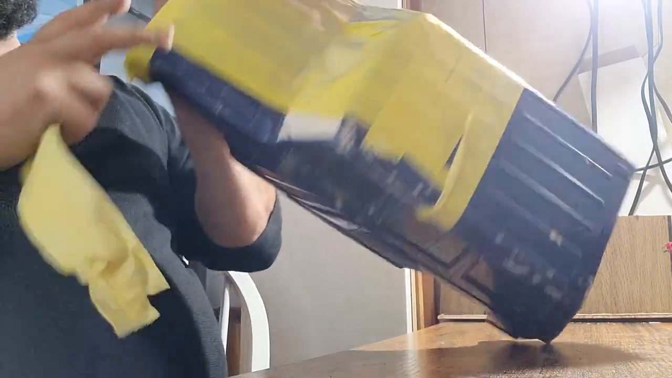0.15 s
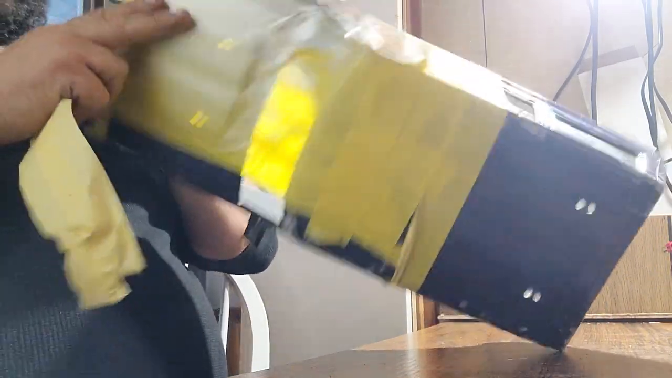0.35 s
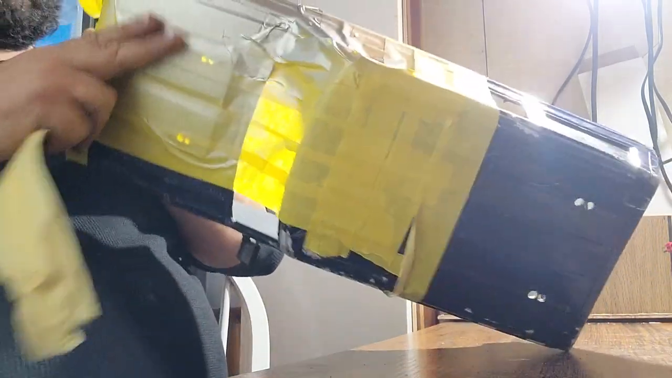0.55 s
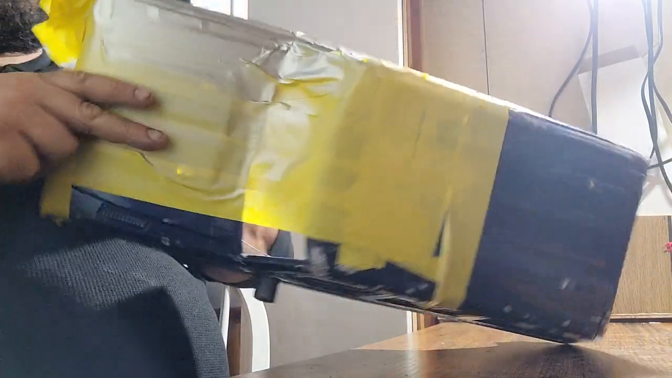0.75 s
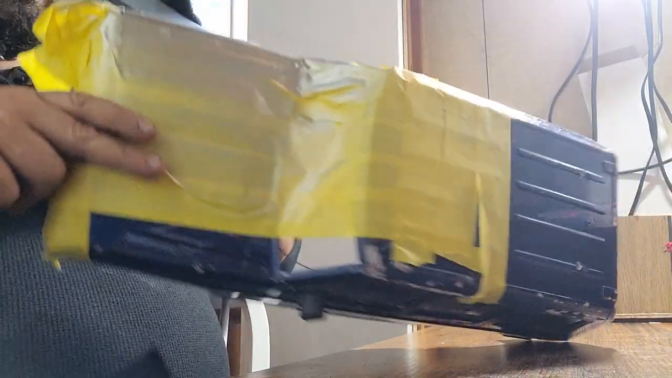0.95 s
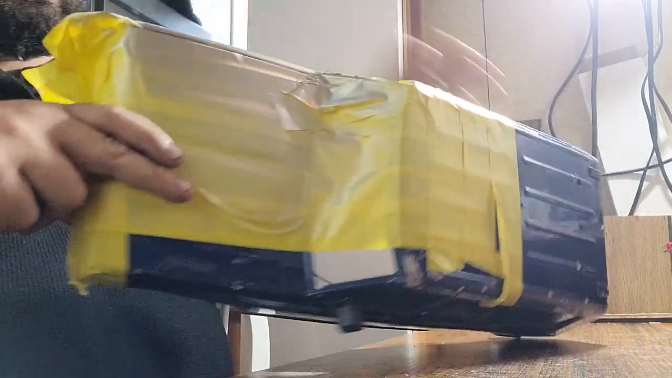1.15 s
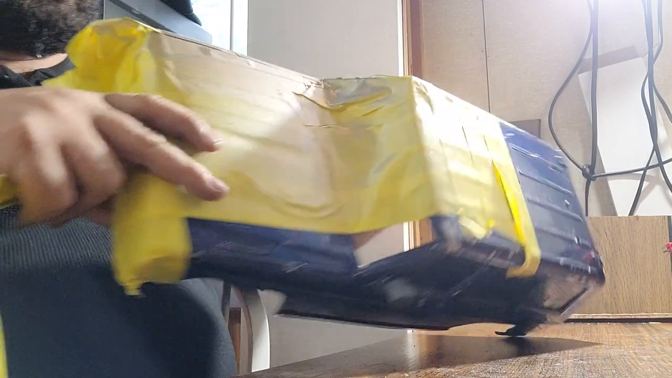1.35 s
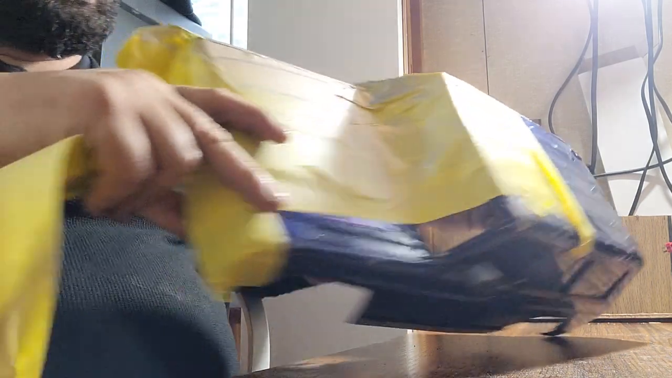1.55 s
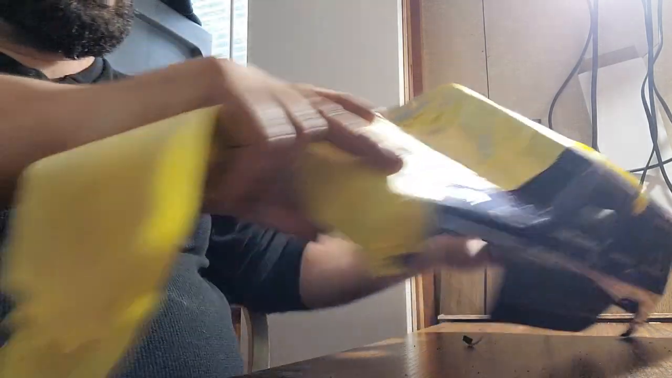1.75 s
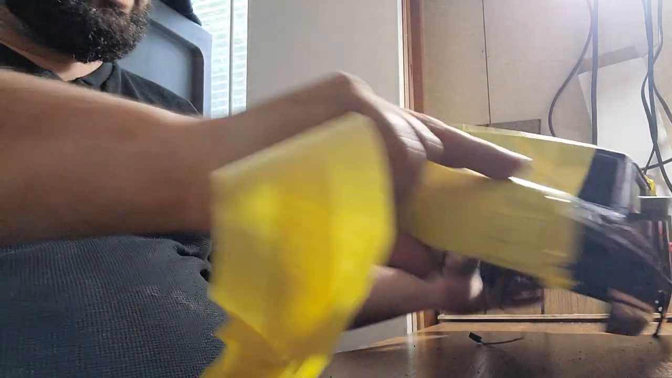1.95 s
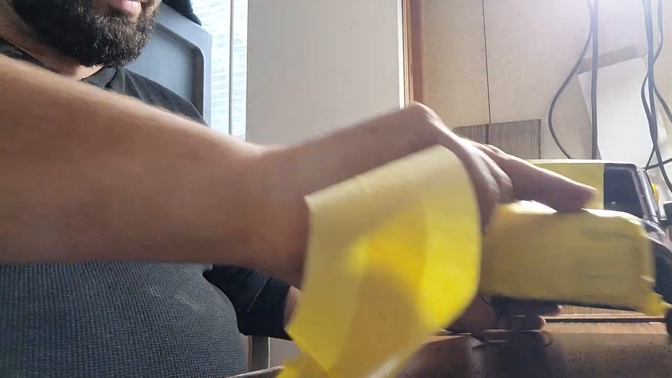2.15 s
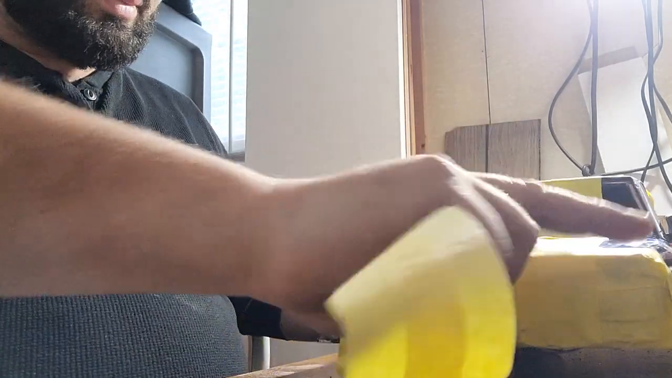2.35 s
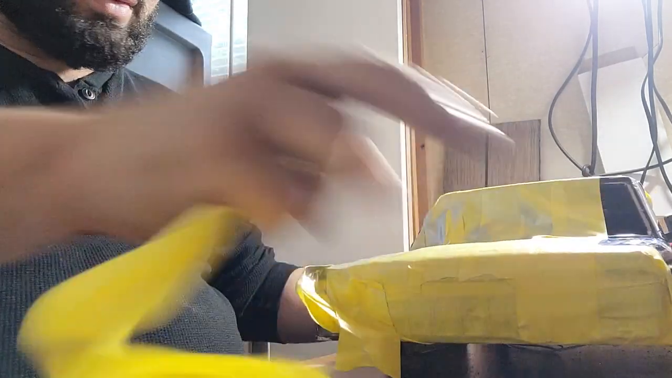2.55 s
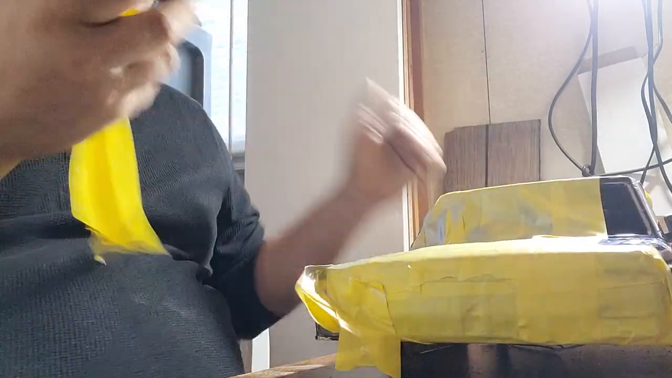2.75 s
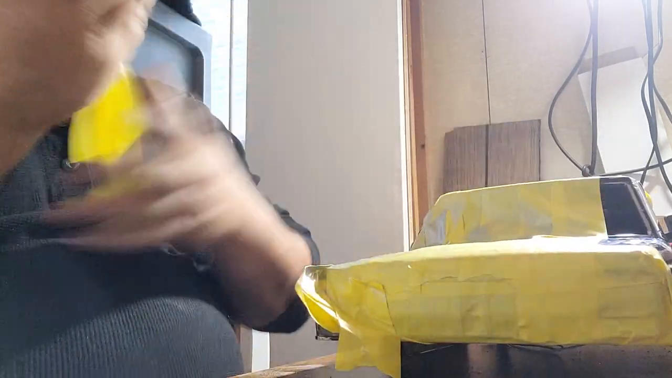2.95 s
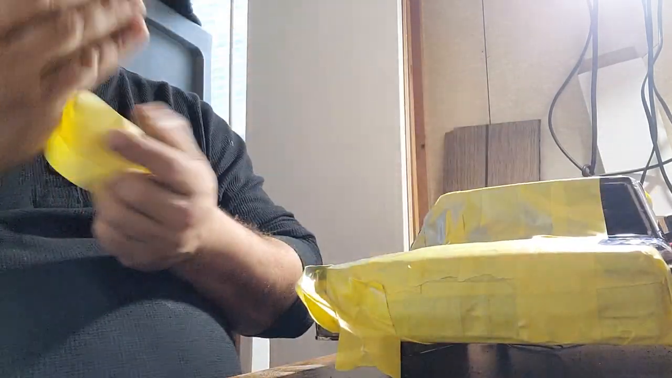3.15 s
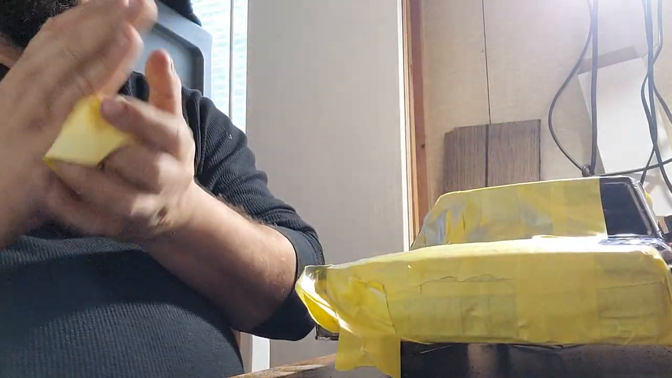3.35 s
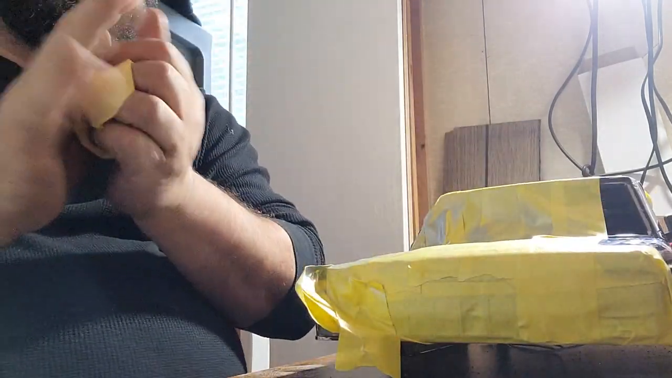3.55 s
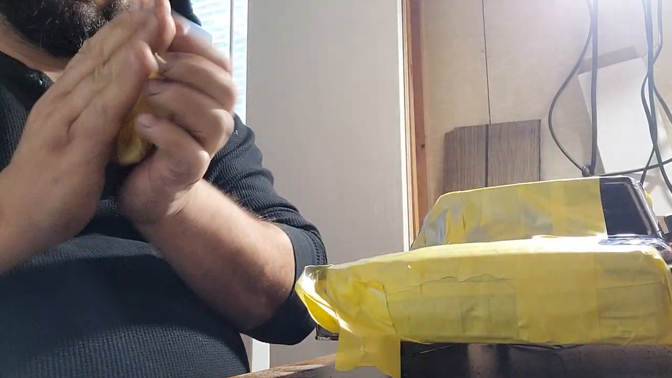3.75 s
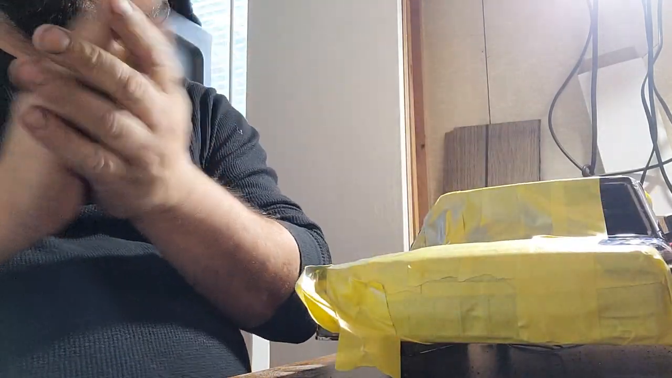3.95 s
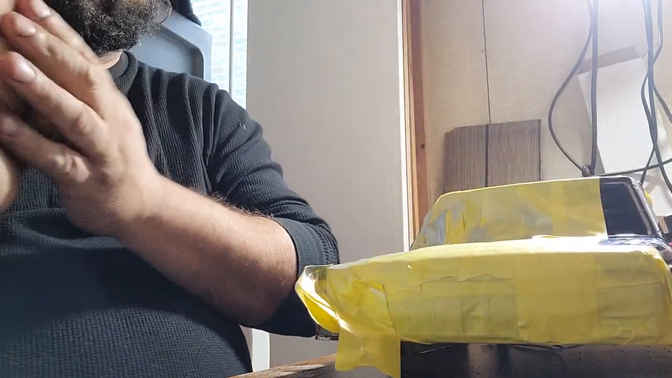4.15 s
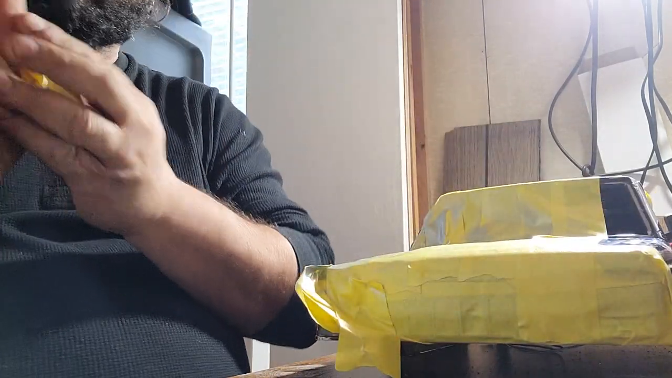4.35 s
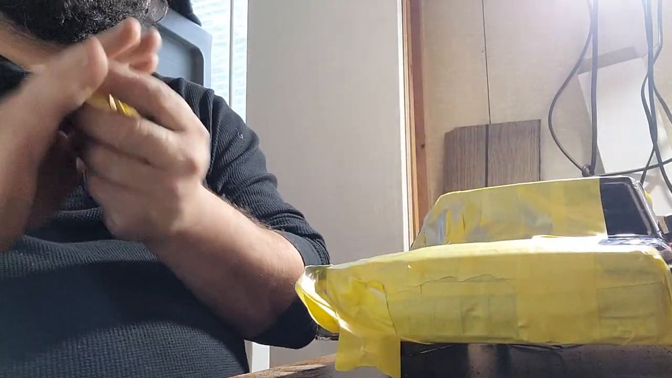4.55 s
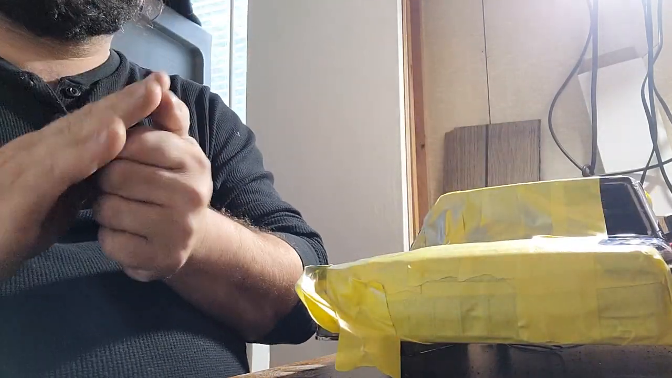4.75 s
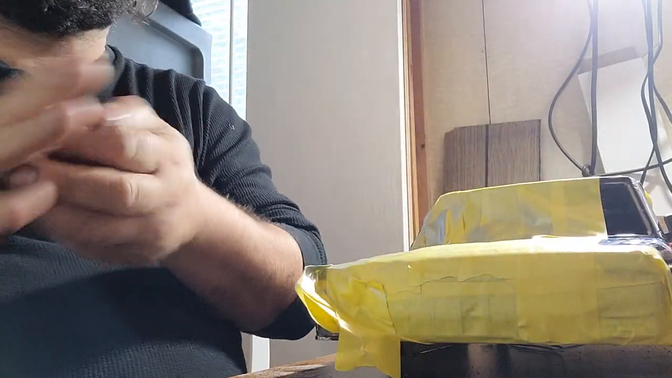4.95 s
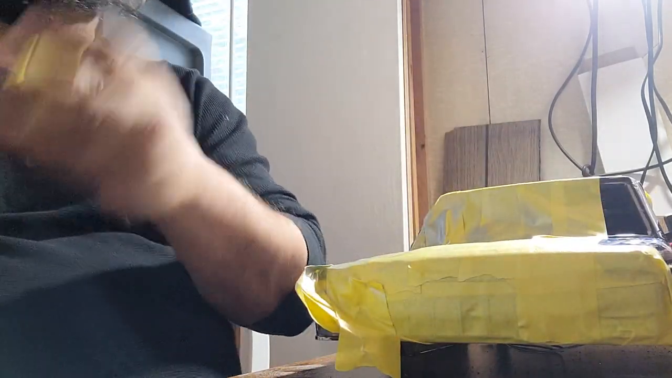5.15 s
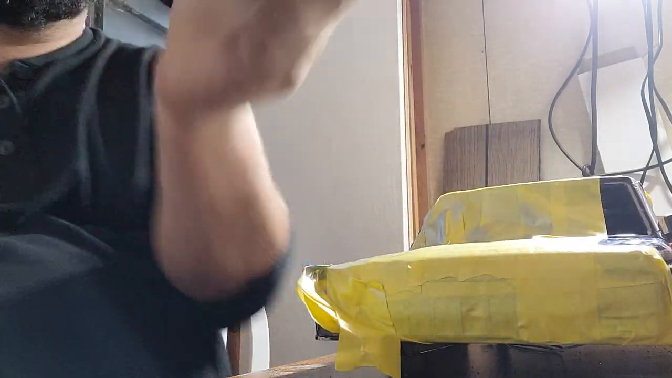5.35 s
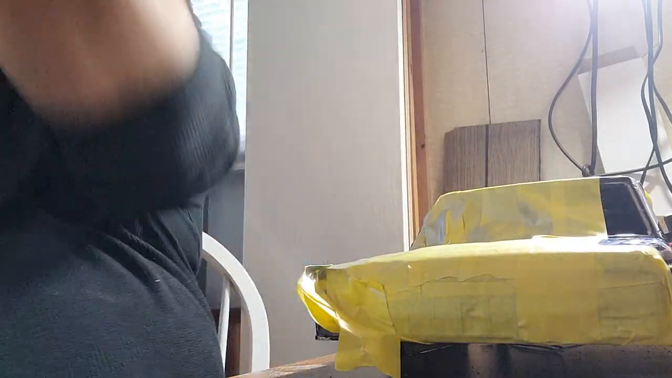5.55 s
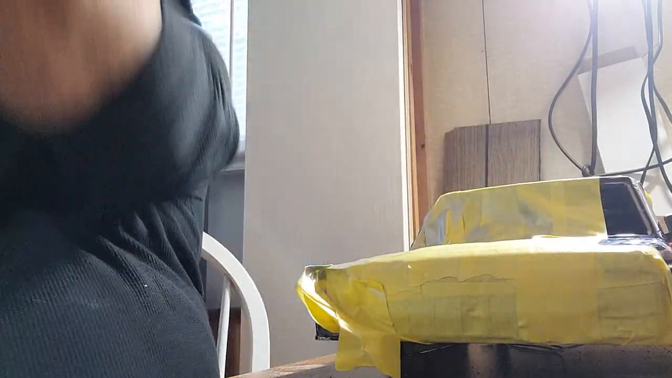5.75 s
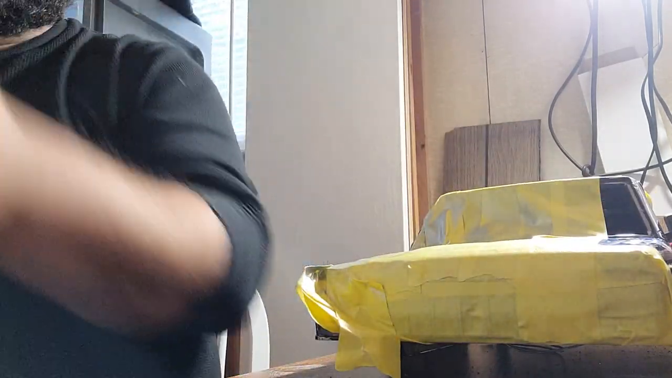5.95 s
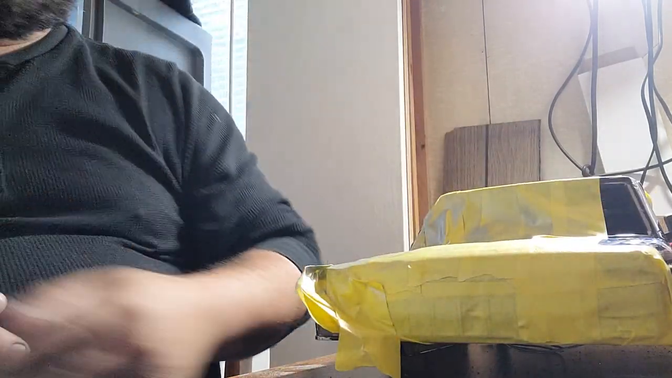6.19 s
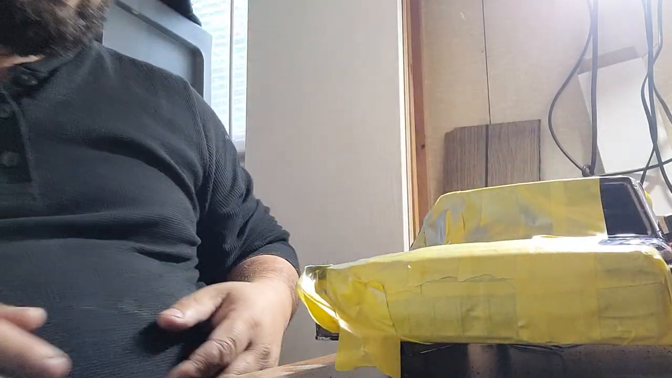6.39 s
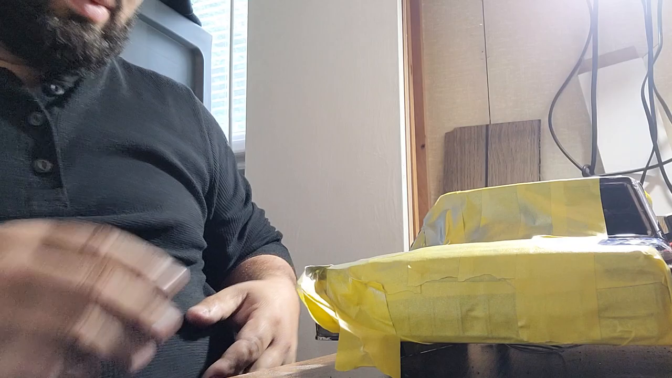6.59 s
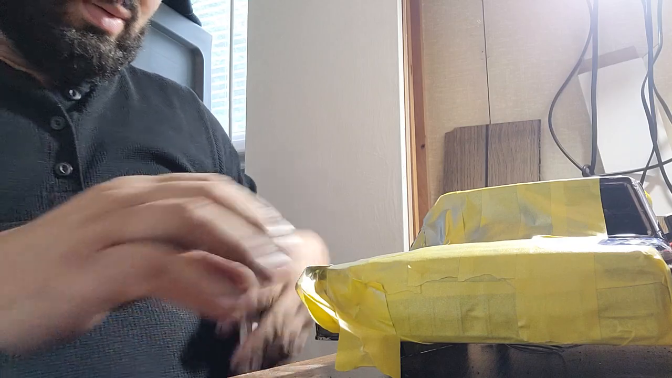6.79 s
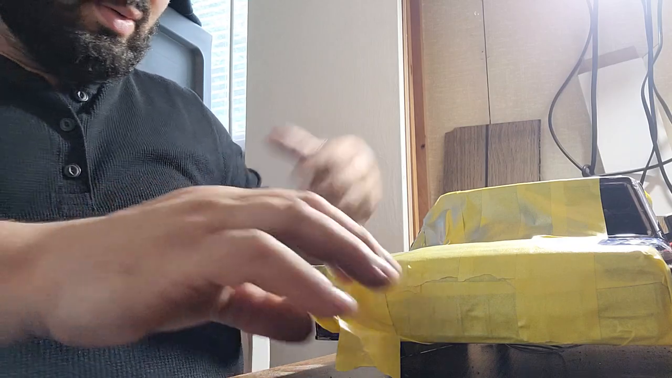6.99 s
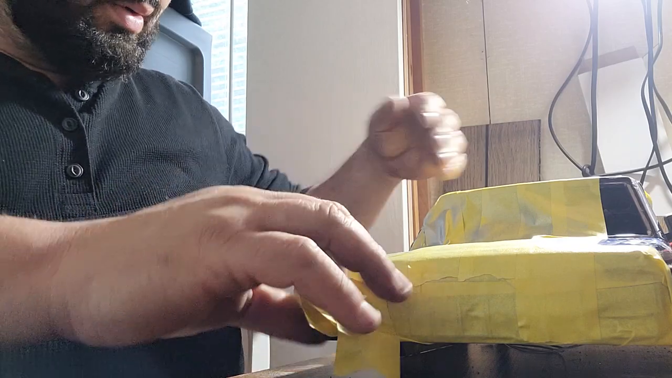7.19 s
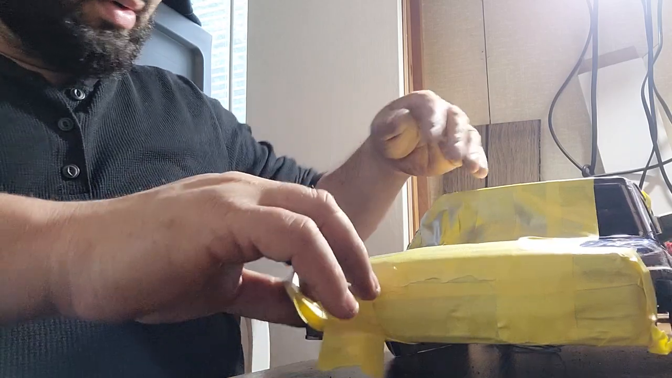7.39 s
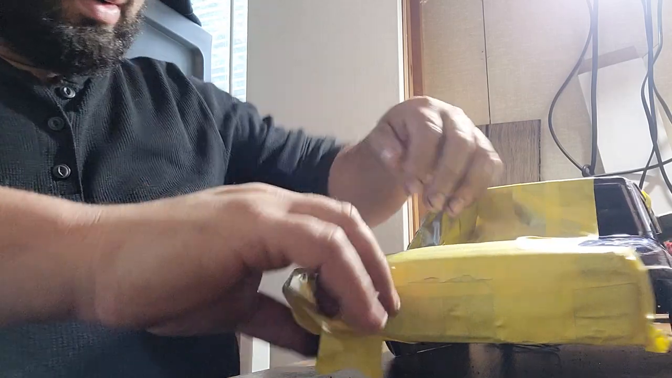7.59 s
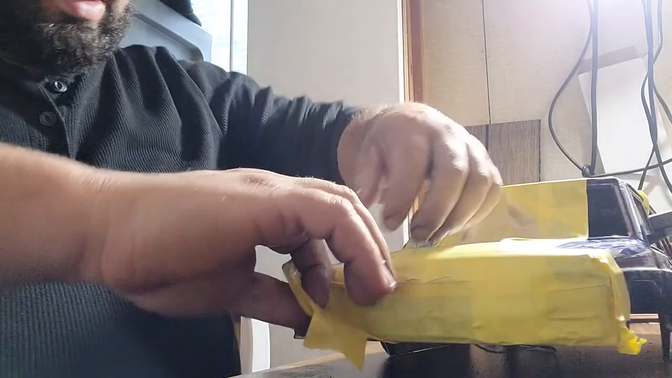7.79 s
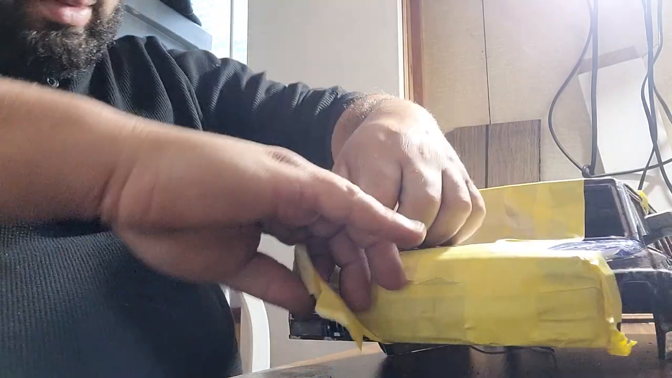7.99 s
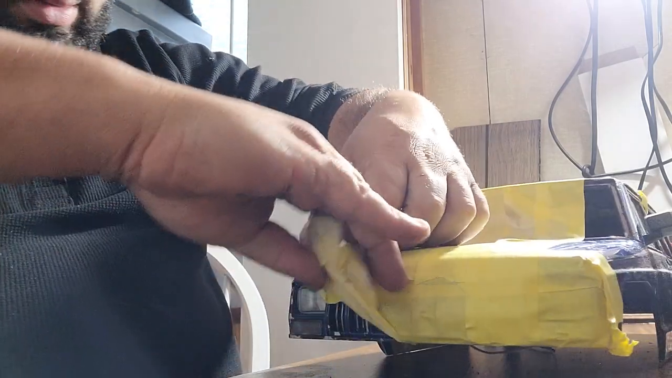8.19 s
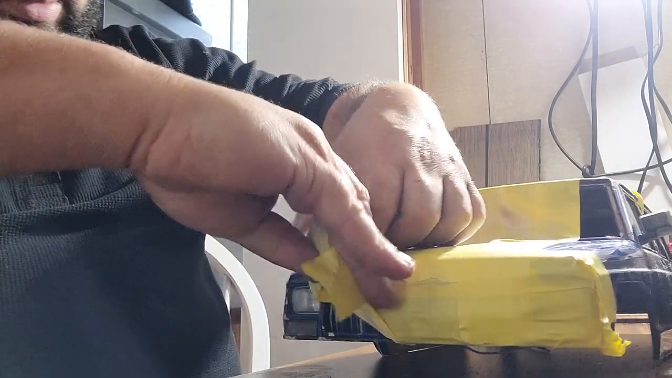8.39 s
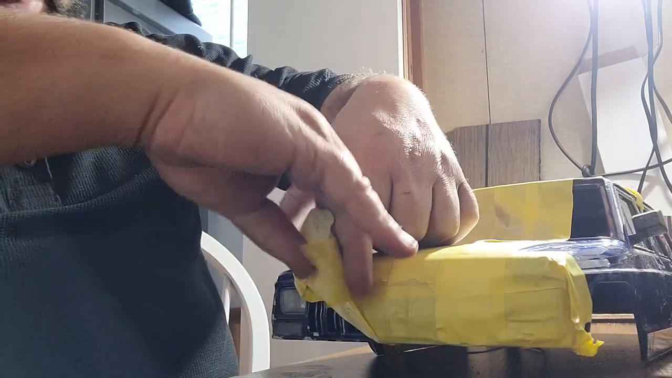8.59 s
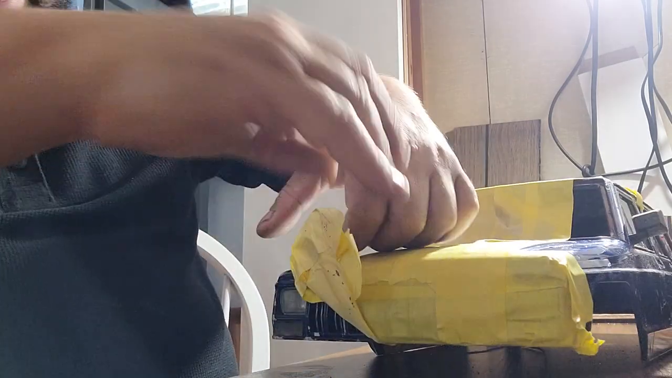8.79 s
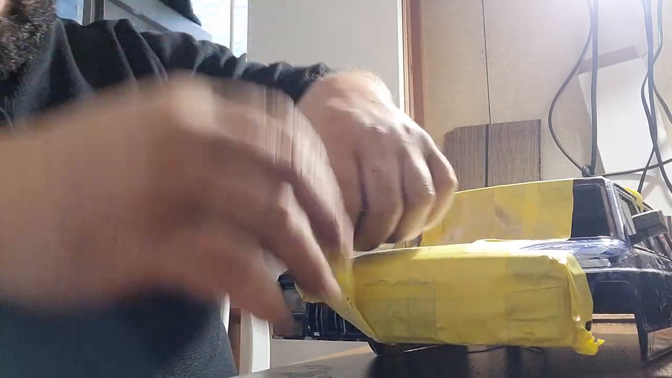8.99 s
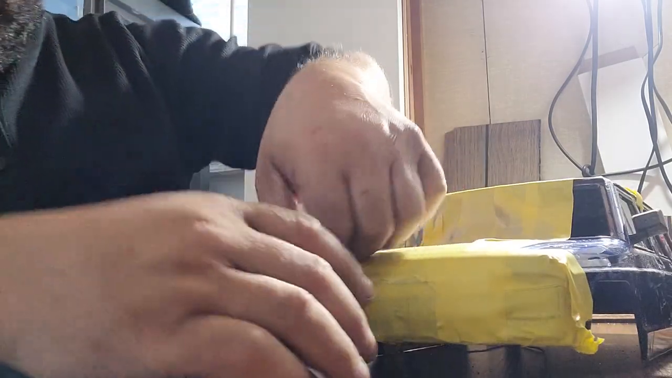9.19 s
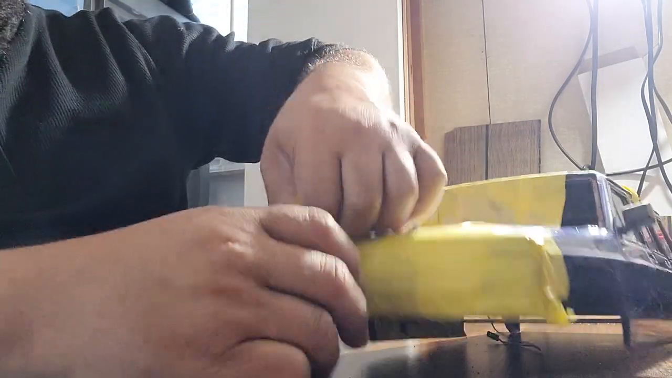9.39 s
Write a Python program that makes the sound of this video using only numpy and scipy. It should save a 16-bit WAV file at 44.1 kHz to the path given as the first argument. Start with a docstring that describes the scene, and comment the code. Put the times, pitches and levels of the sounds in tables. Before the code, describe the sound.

Boomy plastic knocks and a groaning drag on wood give way to crisp tape crumpling, soft bumps, then snappy peeling with dull thumps.

```python
"""On a wooden workbench in a small, quiet room, a hollow plastic model car body wrapped in masking tape
is knocked and dragged: struck modes, and random slips that drive the shell, bench and thin panels.
A strip of tape is crumpled between the palms and tossed aside; tape is tugged and peeled: filtered crackle,
bursts and pops. Each squeeze and rub swells, holds and dies away over a faint bed of room noise.
A phone with two microphones stands close by on the bench."""
import sys
import numpy as np
from scipy import signal
from scipy.fft import rfft, irfft
from scipy.io import wavfile
from scipy.ndimage import uniform_filter1d

SR = 44100
rng = np.random.default_rng(int(sys.argv[2]) if len(sys.argv) > 2 else 0)


def master_out(mix):
    """Clip the mix to full scale and print it as 16-bit PCM to the path in sys.argv[1]."""
    frames = np.transpose(np.atleast_2d(mix))
    ceiling = np.clip(frames, -1, 1)
    pcm = np.round(ceiling * 32767).astype(np.int16)
    wavfile.write(sys.argv[1], SR, pcm)


N = 415863
TIME = np.arange(N) / SR  # s

# Levels in the event tables are a starting balance; each layer adds its own trims.
# the shell dragged and turned on the bench: [t/s, shell drone level/dB, rasp level/dB, hiss level/dB]
DRAG_LEVELS = [(0.0, -38.5, -28.5, -41), (0.12, -42.5, -49.5, -53), (0.36, -42.5, -46, -58.5),
               (0.49, -42, -43, -54.5), (0.69, -36, -56, -60.5), (0.74, -30, -43.5, -52),
               (0.84, -33, -66, -55), (0.91, -40, -52.5, -56), (1.02, -34, -45, -54.5),
               (1.24, -48, -52.5, -57), (1.43, -53.5, -60, -53.5), (1.7, -41.5, -39.5, -51),
               (1.86, -39.5, -44.5, -50), (2.09, -41, -42.5, -65), (2.22, -35, -48, -59.5),
               (2.3, -40.5, -50.5, -59.5)]
# a corner sliding on the wood sings: [t/s, resonance f/Hz, level/dB]
CORNER_SQUEAL = [(1.02, 1900, -61), (1.041, 1862, -47.5), (1.131, 2187, -48.5), (1.24, 1983, -65),
                 (1.451, 4240, -73), (1.68, 3830, -44), (1.76, 3120, -33), (1.871, 2890, -51),
                 (2.12, 2360, -54), (2.2, 2430, -79)]
# the shell tips off its corner just before it drops again: [t/s, length/s, dip level/dB]
CORNER_LIFTS = [(0.495, 0.18, -19.5), (2.267, 0.29, -21)]
# knocks and bumps: shell and bench struck, the tossed ball of tape landing, an arm set down:
# [t/s, shell peak level/dB, shell f/Hz, thud level/dB, thud f/Hz, clack level/dB, clack f/Hz]
BUMPS = [(0.011, -17, 347, -44, 117, -35, 876), (0.238, -10, 261, -22, 126, -34.5, 616),
         (0.405, -13, 292, -42, 164, -38, 463), (0.422, -1.5, 293, -20.5, 160, -27, 493),
         (0.686, -20, 255, -34, 142, -44.5, 589), (0.78, -9.5, 250, -61, 164, -35.5, 670),
         (0.807, -6.5, 300, -37, 130, -23.5, 690), (1.033, -28.5, 350, -36, 120, -38, 530),
         (1.445, -23, 265, -37, 161, -48.5, 810), (1.97, -27.5, 268, -39, 128, -36, 847),
         (2.205, -26, 279, -38, 134, -42.5, 850), (2.375, -17.5, 278, -34, 115, -44.5, 844),
         (2.404, -6, 255, -30, 102, -31, 750), (2.423, -4, 300, -22, 65, -19, 560),
         (2.445, -3, 235, -22, 145, -22.5, 910), (2.839, -41, 285, -65, 98, -64, 494),
         (3.272, -37, 287, -65, 103, -49, 611), (3.416, -39, 292, -70, 103, -62, 613),
         (4.035, -36, 280, -38.5, 100, -52, 1170), (5.436, -32.5, 266, -62, 138.5, -50.5, 640),
         (5.563, -40.5, 292, -63, 137, -68, 600), (5.853, -26.5, 220, -43, 163, -33, 1060),
         (5.876, -25, 322, -32.5, 120, -32.5, 508), (5.991, -23, 191, -34, 164, -46.5, 550),
         (6.124, -31.5, 300, -44, 156, -47.5, 735), (6.212, -26, 312, -35, 76, -38.5, 503),
         (6.245, -34, 293, -37, 56.2, -37.5, 541), (6.63, -37.5, 364, -47.5, 111, -59, 826),
         (6.693, -29.5, 288, -44, 104.6, -56.5, 734), (6.965, -38.5, 276, -45, 115.8, -71, 505),
         (7.401, -31.5, 283, -66, 60, -50, 551), (7.432, -26, 268, -48, 53, -46, 710),
         (7.535, -32, 238, -36.5, 102, -47.5, 840), (7.742, -21, 286, -37.5, 72.4, -42, 910),
         (7.92, -32.5, 258, -61.5, 70, -43.5, 600), (8.068, -29.5, 282, -48, 148, -53, 610),
         (8.292, -23, 343, -46, 57, -36, 580), (8.467, -11.5, 225, -22.5, 72.6, -32.5, 553),
         (8.566, -22, 318, -61, 59, -36, 590), (8.587, -26, 273, -37, 148, -37.5, 780),
         (8.708, -14.5, 257, -23.5, 86.1, -25.5, 950), (9.268, -29.5, 337, -45, 152, -40.5, 686),
         (9.319, -16, 264, -32, 122, -44, 560)]
# creases that snap and glue that lets go: [t/s, level/dB, crease f/Hz]
CREASE_SNAPS = [(0.186, -50, 3460), (0.24, -54, 1800), (1.72, -37, 3845), (2.535, -57, 4900),
                (2.705, -36.5, 3300), (3.04, -45.5, 1450), (3.111, -57, 1500), (3.172, -38.5, 3750),
                (3.2962, -42.5, 2900), (3.4933, -44, 2900), (3.704, -39.5, 5100), (3.853, -41, 4760),
                (3.8761, -34.5, 2800), (3.9515, -37.5, 3150), (3.9736, -36.5, 1240), (4.0518, -32, 1700),
                (4.0627, -37, 1260), (4.087, -37.5, 1420), (4.26, -41.5, 2880), (4.366, -39, 1920),
                (4.4232, -48, 6400), (4.4556, -41, 3200), (4.4629, -27.5, 2130), (4.6429, -28.5, 2600),
                (4.6745, -36.5, 3140), (4.9385, -47.5, 1590), (5.1121, -45.5, 2640), (5.142, -41, 4520),
                (5.271, -47, 3400), (5.855, -36, 2530), (5.992, -43.5, 3650), (6.116, -44.5, 2460),
                (6.214, -46, 1900), (7.837, -34.5, 6100), (7.8439, -30.5, 5600), (8.0367, -36.5, 4380),
                (8.1, -33, 4500), (8.2445, -28.5, 4430), (8.2715, -34.5, 5960), (8.306, -27, 4770),
                (8.3644, -32, 4840), (8.5631, -34.5, 5950), (8.578, -39.5, 2410), (8.743, -42, 6400),
                (9.253, -46.5, 2690)]
# short tugs at the tape: [t/s, length/s, level/dB]
TAPE_TUGS = [(0.385, 0.11, -50.5), (0.643, 0.047, -57), (0.843, 0.077, -51), (1.97, 0.025, -48.5),
             (2.384, 0.03, -50), (2.638, 0.04, -53), (7.31, 0.065, -50), (7.407, 0.032, -49),
             (7.483, 0.02, -51.5), (7.674, 0.028, -46.5), (7.741, 0.019, -33), (8.217, 0.13, -36.5),
             (8.716, 0.1, -49.5), (9.264, 0.019, -43)]
# hands and sleeves rub over the tape: [t/s, length/s, rustle level/dB, shell drone level/dB]
HAND_RUBS = [(2.52, 0.22, -63.5, -64), (5.43, 0.11, -61, -53.5), (5.55, 0.083, -64.5, -58),
             (6.03, .29, -55, -50), (6.4, 0.4, -73, -73), (6.64, 0.11, -68, -50), (6.8, 0.18, -81, -61.5),
             (7.28, .07, -63, -51.5), (7.4, 0.039, -67, -44), (7.53, 0.18, -60.5, -56),
             (7.7, 0.23, -53, -40.5), (8.05, 0.38, -49, -46.5), (8.33, .1, -61, -38.5),
             (8.455, 0.015, -43.5, -30.5), (8.56, 0.047, -49, -33.5), (8.68, 0.043, -56.5, -53),
             (8.9, 0.25, -80.5, -62), (9.17, 0.095, -58.5, -49), (9.26, 0.14, -55, -40)]
# the shell judders on its corner and groans: [t/s, slip rate f/Hz, level/dB]
CORNER_GROAN = [(0.66, 250.5, -49), (0.692, 263.3, -29), (0.724, 266.3, -22), (0.772, 250.5, -27),
                (0.815, 281.5, -17), (0.88, 271.1, -25), (1.052, 263.5, -42), (1.12, 272, -57)]
# the palms squeeze the tape: [t/s, length/s, crackle level/dB, dull palm rub level/dB]
PALM_SQUEEZES = [(3.11, 0.1, -48, -49), (3.29, 0.079, -44.5, -49), (3.425, 0.1, -38, -44),
                 (3.695, 0.018, -35.5, -39), (3.78, 0.043, -38.5, -44.5), (3.88, 0.0076, -43, -42.5),
                 (3.96, 0.023, -39, -43), (3.995, 0.031, -36, -34.5), (4.135, 0.066, -37, -44.5),
                 (4.37, 0.15, -50.5, -55.5), (4.6, 0.084, -41.5, -67), (4.72, 0.072, -53.5, -68),
                 (4.93, 0.18, -52.5, -63), (5.09, 0.058, -45, -49.5), (5.2, .1, -56.5, -58.5),
                 (5.72, 0.0099, -46, -51)]

# modes of the plastic shell, lowest four first as the body: [f/Hz, level/dB, t60/s]
SHELL_MODES = [(213.5, 0, 0.072), (249.9, 0.5, 0.13), (277.6, 3, 0.12), (335, -0.5, 0.14),
               (458.6, -12.5, 0.12), (557.3, -6, 0.057), (595.4, -20, 0.15), (729, -12, 0.063),
               (847, -24, 0.22), (869, -15, 0.088), (954, -20.5, 0.12), (1116, -26.5, 0.028),
               (1284, -21.5, 0.11)]
# modes of the bench top: [f/Hz, level/dB, t60/s]
BENCH_MODES = [(65, 0, .25), (82, -6, .14), (104, -4, .13), (124, -2, .14), (143, -1, .2)]
# thin panels that answer the scraping: [f/Hz, level/dB, t60/s]
PANEL_MODES = [(1350, -3, .008), (1920, 0, .01), (2430, -5, .008), (3130, -2, .01), (3800, -5, .008)]

# colour of the crumpling tape: [f/Hz, level/dB]
TAPE_COLOUR = [(700, -25), (1300, 1), (2000, 3.5), (4400, -7.5), (6500, 1), (9000, -25.5), (14000, -52.5)]
# colour of the breaking glue: [f/Hz, level/dB]
GLUE_COLOUR = [(700, -11.5), (1800, -3), (3800, -1.5), (7000, -1.5), (9000, -23.5), (14000, -44)]
# midrange rasp of the rubbed shell: [f/Hz, level/dB]
RASP_COLOUR = [(250, -34.5), (480, -4), (620, -4), (850, 5), (1100, -8.5), (1400, -13), (2500, -39.5)]
# broad hiss of the scrape: [f/Hz, level/dB]
HISS_COLOUR = [(800, -4), (1400, -1), (2000, -3.5), (4000, -6.5), (7000, -13), (9000, -26.5), (13000, -18),
               (16000, -15)]
# top-octave fizz of the tape: [f/Hz, level/dB]
FIZZ_COLOUR = [(7000, -30), (9500, -10.5), (12500, -1), (16000, -1.5)]
# dull rub between the palms: [f/Hz, level/dB]
PALM_COLOUR = [(200, -12.5), (500, -3.5), (950, 4.5), (1350, 8), (2200, -30)]
# bright contact tick: [f/Hz, level/dB]
TICK_COLOUR = [(600, -2), (1400, 1), (2800, -4), (4500, -14.5), (7000, -20.5), (9000, -33), (13000, -27.5)]
# hollow rattle in a bump: [f/Hz, level/dB]
RATTLE_COLOUR = [(250, -25), (500, 5), (950, 14), (1500, -6), (3000, -37)]
# what a single crease radiates: [f/Hz, level/dB]
SHEET_COLOUR = [(300, -13), (1200, 0), (2000, 1.5), (4200, -3.5), (6800, 0.5), (9000, -18), (16000, -24)]
# background noise of the quiet room: [f/Hz, level/dB]
ROOM_TONE_COLOUR = [(24, -47), (40, -9), (77, 2), (171, -15), (290, -3.5), (402, -30), (503, -22.5),
                    (1480, -47.5), (6170, -36.5), (8340, -44.5), (16000, -28.5)]

# balance for sound from the shell, slightly rescaled by lean(): [f/Hz, left minus right level/dB]
SHELL_BALANCE = [(60, -3), (110, -7), (200, -10), (380, -6), (700, -1.5), (2400, -6), (4400, -1.5),
                 (15000, -3.5)]
# bands of the room tail: [low edge f/Hz, high edge f/Hz, t60/s]
ROOM_BANDS = [(80, 490, .3), (724, 4400, 0.2), (4343, 20000, 0.15)]

ROOM_TONE_DB, TOP_HZ = -67.5, 16100
# the smaller and higher a crease, the more it clicks in the top octave
CREASE_HZ, CLICK_DB_PER_OCTAVE = 2830, 8.5
# time to rise by 60 dB and to fall by 60 dB
SQUEEZE_ATTACK_S, SQUEEZE_T60_S = 0.077, 0.24
RUB_ATTACK_S, RUB_T60_S = 0.21, 0.37


def undb(db):
    """Decibels to gain."""
    return 10 ** (np.asarray(db) / 20)


def unit(x):
    """Scale to rms 1."""
    return x / np.sqrt(np.mean(x ** 2) + 1e-20)


def fade(t60, count):
    """Exponential decay by 60 dB in t60 seconds."""
    return np.exp(-np.log(1000) * np.arange(count) / SR / t60)


def hump(start_s, length_s):
    """Half a sine: swell and fall between two moments, zero elsewhere."""
    return np.abs(np.sin(np.pi * np.clip((TIME - start_s) / length_s, 0, 1)))


def add(out, x, start_s):
    """Mix x into out at a moment in seconds."""
    i = max(int(start_s * SR), 0)
    out[:, i:i + x.shape[1]] += x[:, :max(N - i, 0)]


def gains(table, fall_db_per_s=150):
    """One gain curve for each dB column; it dies away after the last point."""
    s, *columns = np.transpose(table)
    tail_db = fall_db_per_s * np.maximum(TIME - s[-1], 0)
    return [undb(np.interp(TIME, s, column) - tail_db) for column in columns]


def strokes(table, attack_s, t60):
    """Each stroke of the hand swells, holds and dies away; one gain curve for each dB column."""
    out = 0
    for s, length, *db in table:
        away = np.maximum(s - TIME, 0) / attack_s + np.maximum(TIME - s - length, 0) / t60
        envelope = np.exp(-np.log(1000) * np.minimum(away, 2))  # floor at -120 dB
        out = np.maximum(out, undb(db)[:, None] * envelope)
    return out


def grip(rate):
    """The pressure of the hand wanders at random, at rms 1, with `rate` new values a second."""
    hold = int(SR / rate)
    steps = np.repeat(rng.standard_normal(N // 200), hold)[:N]
    return unit(uniform_filter1d(steps, size=hold))


def colour(x, points):
    """Causal minimum-phase filter with the given (f/Hz, level/dB) outline, made through the cepstrum."""
    hz, db = np.transpose(points)
    size = 2048
    bins_hz = np.fft.rfftfreq(size, 1 / SR)
    log_gain = np.log(undb(np.interp(np.log(bins_hz + 1), np.log(hz), db)))
    cepstrum = irfft(log_gain)[:size // 2]
    cepstrum[0] /= 2
    response = irfft(np.exp(rfft(2 * cepstrum, size)))[:size // 2]
    return signal.fftconvolve(x, response[None], axes=-1)[:, :x.shape[1]]


def burst(t60, spread, count):
    """Dying noise, partly different at the two microphones."""
    shared = rng.standard_normal(count)
    return (shared + spread * rng.standard_normal((2, count))) * fade(t60, count)


def blow(x, db):
    """Set the rms level of the first 30 ms of a blow, taken in mono."""
    onset = x.mean(0)[:int(.03 * SR)]
    return x * undb(db) / np.sqrt(np.mean(onset ** 2) + 1e-20)


def ring(modes, count, detune=0.022, scatter_db=6.5, skew=0.96):
    """Struck modes; the grip of the hands shifts their pitch and strength from blow to blow."""
    t = np.arange(count) / SR
    out = 0
    for hz, db, t60 in modes:
        pitch, size, left, right = rng.standard_normal(4)
        phase = 2 * np.pi * hz * (1 + detune * pitch) * t + skew * np.array([[left], [right]])
        out = out + undb(db + scatter_db * size) * np.sin(phase) * fade(t60, count)
    return out * (1 - np.exp(-t / 0.0042))  # soft onset


def struck_at(modes, hz, slope_db):
    """The place of the blow favours the modes near one pitch; the others fall by slope_db an octave."""
    return [(f, db - slope_db * abs(np.log2(f / hz)), t60) for f, db, t60 in modes]


def crackle(rate, spread_db, t60, flutter, apart=1.0):
    """Random slips, a few large among many small, each followed by its own flutter of the sheet."""
    slips = np.zeros(N)
    draws = rng.random((N // 8, 3))[:int(rate * N / SR)]
    size = np.minimum(-np.log(1 - draws[:, 1]), 4)
    slips[(draws[:, 0] * N).astype(int)] = undb(spread_db * size) * np.sign(draws[:, 2] - .5)
    keep = np.exp(-2 * np.log(1000) / t60 / SR)
    energy = np.abs(signal.lfilter([1 - keep], [1, -keep], slips ** 2 + 1e-12))
    out = slips + flutter * np.sqrt(energy) * unit(burst(np.inf, apart, N))
    # the hand moves steadily, so the slips even out over a few hundredths of a second
    return out / np.sqrt(uniform_filter1d(np.mean(out ** 2, 0), size=2200) + 1e-9)


def resonate(x, modes):
    """Drive the modes with a continuous force."""
    response = ring(modes, count=12000, detune=0.0022, scatter_db=0.5, skew=0.97)
    return unit(signal.oaconvolve(x.mean(0)[None], response, axes=-1)[:, :N])


def room_tone():
    """Steady coloured noise, mostly shared by both microphones: the quiet air of the room."""
    return unit(colour(burst(np.inf, 0.23, N), ROOM_TONE_COLOUR)) * undb(ROOM_TONE_DB)


def lifted():
    """Gain of the contact with the bench: it fades and returns each time the shell tips."""
    return undb(sum(db * hump(s, length) ** 2 for s, length, db in CORNER_LIFTS))


def squeal(squeal_db=0, panel_hz=1900, answer_db=-1):
    """A sliding corner sings on a wandering contact resonance, and a panel sings along."""
    # the contact resonance shifts as the body tips over
    s, hz, db = np.transpose(CORNER_SQUEAL)
    lowpass = signal.butter(2, 170, fs=SR, output="sos")
    waver = unit(signal.sosfilt(lowpass, rng.standard_normal((2, N))))
    corner_hz = np.interp(TIME, s, hz) + 340 * unit(uniform_filter1d(rng.standard_normal(N), size=20))
    corner = np.sin(2 * np.pi * np.cumsum(corner_hz) / SR) * waver
    panel = np.sin(2 * np.pi * np.cumsum(panel_hz + 70 * grip(rate=11)) / SR)
    panel = panel * np.roll(waver, SR, axis=1) * undb(answer_db)  # rolled to waver independently
    return (corner + panel) * undb(np.interp(TIME, s, db, left=-120, right=-120) + squeal_db)


def drag(drone_db=2, bench_db=-10, rasp_db=2, hiss_db=1, panel_db=-3, drone_cap_db=-32, uneven_db=2):
    """The shell sticks and slips over the wood; the level of its drone is capped."""
    drone, rasp, hiss = (g * lifted() * undb(uneven_db * grip(rate=22)) for g in gains(DRAG_LEVELS))
    drone = np.minimum(drone, undb(drone_cap_db))
    slips = crackle(rate=1500, spread_db=1.5, t60=0.018, flutter=2.5)
    out = resonate(slips, SHELL_MODES) * drone * undb(drone_db)
    out += resonate(slips, BENCH_MODES) * drone * undb(bench_db)
    out += unit(colour(slips, RASP_COLOUR)) * rasp * undb(rasp_db)
    scrape = unit(colour(slips, HISS_COLOUR)) * undb(hiss_db)
    scrape += resonate(slips, PANEL_MODES) * undb(panel_db)
    return out + scrape * hiss + squeal()


def knocks_and_bumps(shell_db=-1, thud_db=0, clack_db=-2.0, rattle_db=-6, tick_db=-12, count=18000):
    """Each mixes low and upper shell modes, a thump of the bench, and a noisy rattle and tick."""
    out = np.zeros((2, N))
    for s, peak, shell_hz, thud, thud_hz, clack, clack_hz in BUMPS:
        low_modes = struck_at(SHELL_MODES[:4], shell_hz, slope_db=14)
        body = ring(low_modes, count, detune=.01, scatter_db=1, skew=.25)
        hit = body / np.abs(body.mean(0)).max() * undb(peak + shell_db)
        bench_modes = struck_at(BENCH_MODES, thud_hz, slope_db=17)
        bench = ring(bench_modes, count, detune=0.078, scatter_db=6.5, skew=0.35)
        hit += blow(bench, thud + thud_db)
        high_modes = struck_at(SHELL_MODES[4:], clack_hz, slope_db=20)
        upper = ring(high_modes, count, detune=.012, scatter_db=1.5, skew=.6)
        hit += blow(upper, clack + clack_db)
        hit += blow(colour(burst(0.094, 0.35, count), RATTLE_COLOUR), clack + rattle_db)
        hit += blow(colour(burst(0.089, 1.0, count), TICK_COLOUR), clack + tick_db)
        add(out, hit, s)
    return out


def crease(t60, flutter, count=1500):
    """One buckle of paper tape: a sharp click, then a short flutter of the sheet."""
    sheet = unit(burst(t60, 1.0, count)) * flutter / np.sqrt(count)
    sheet[:, 0] += 1
    return sheet


def snaps(snap_db=19, flutter_db=-3, click_db=-8, low_db=-17, side_db=-7, high_db=-12, count=4000):
    """Single creases pop through: a dry click, then a flutter coloured by the size of the crease."""
    out = np.zeros((2, N))
    for s, db, hz in CREASE_SNAPS:
        size = [(hz / 4, low_db), (hz / 1.5, side_db), (hz, 0), (hz * 1.5, side_db), (hz * 3, high_db)]
        pop = colour(colour(crease(t60=0.003, flutter=.9, count=count), SHEET_COLOUR), size)
        add(out, pop / np.abs(pop).max() * undb(db + snap_db), s)
        flutter = colour(colour(burst(0.048, 1.0, count), SHEET_COLOUR), size)
        add(out, blow(flutter, db + flutter_db), s)
        top_db = db + click_db + CLICK_DB_PER_OCTAVE * np.log2(hz / CREASE_HZ)
        click = colour(crease(t60=0.03, flutter=1.5, count=count), FIZZ_COLOUR)
        add(out, blow(click, top_db), s)
    return out


def peel(rustle_db=0, rub_fizz_db=-3, pull_db=0, pull_fizz_db=0, drone_db=-2, rasp_db=-11, bench_db=-8,
         uneven_db=3):
    """Threads of glue break one by one; rubbing the tape also drives the shell and bench."""
    rubs = strokes(HAND_RUBS, RUB_ATTACK_S, RUB_T60_S)
    rustle, drone = rubs * undb(uneven_db * grip(rate=17))
    pull = sum(np.sqrt(hump(s, length)) * undb(db) for s, length, db in TAPE_TUGS)
    crisp = rustle * undb(rustle_db) + pull * undb(pull_db)
    fizz = rustle * undb(rub_fizz_db) + pull * undb(pull_fizz_db)
    threads = crackle(rate=1400, spread_db=4.2, t60=.01, flutter=1.6)
    tape = unit(colour(threads, GLUE_COLOUR)) * crisp + unit(colour(threads, FIZZ_COLOUR)) * fizz
    body = resonate(threads, SHELL_MODES) * undb(drone_db)
    body += resonate(threads, BENCH_MODES) * undb(bench_db)
    body += unit(colour(threads, RASP_COLOUR)) * undb(rasp_db)
    return tape, body * drone


def groan(groan_db=0, rough=0.4, overtone_db=-26):
    """Stick and slip lock to the lowest modes of the shell: an almost pure, unsteady tone."""
    s, hz, db = np.transpose(CORNER_GROAN)
    phase = 2 * np.pi * np.cumsum(np.interp(TIME, s, hz)) / SR
    shake = unit(uniform_filter1d(uniform_filter1d(rng.standard_normal(N), size=700), size=700))
    tone = (np.sin(phase) + undb(overtone_db) * np.sin(3 * phase)) * (1 + rough * shake)
    return unit(tone) * undb(np.interp(TIME, s, db, left=-120, right=-120) + groan_db)


def pocket(hz, t60, count):
    """The small air pocket behind a crease rings briefly as a decaying sine."""
    t = np.arange(count) / SR
    return np.sin(2 * np.pi * hz * t + 3.03 * rng.standard_normal((2, 1))) * fade(t60, count)


def pops(rate, centre_hz, octaves=0.49, spread_db=4, t60=0.03, count=1500):
    """Small pockets that cave in at random, each with another pitch."""
    out = np.zeros((2, N))
    for when, pitch, size in rng.random((int(rate * N / SR), 3)):
        hz = centre_hz * 2 ** (octaves * (2 * pitch - 1))
        strength = undb(-spread_db * np.log(1.02 - size))  # few large, many small
        add(out, pocket(hz, t60, count) * strength, when * N / SR)
    return unit(out)


def crumple(crackle_db=0, palm_db=-1, fizz_db=-5, crisp_pops_db=-11, dull_pops_db=-5):
    """A strip is rolled into a ball: dense buckling and popping pockets, with a duller rub of the palms."""
    crisp, palm = strokes(PALM_SQUEEZES, SQUEEZE_ATTACK_S, SQUEEZE_T60_S)
    folds = crackle(rate=1000, spread_db=5.4, t60=.009, flutter=1.5)
    bright = unit(colour(folds, TAPE_COLOUR)) * undb(crackle_db)
    bright += pops(rate=230, centre_hz=3036) * undb(crisp_pops_db)
    bright += unit(colour(folds, FIZZ_COLOUR)) * undb(fizz_db)
    dull = unit(colour(folds, PALM_COLOUR)) * undb(palm_db)
    dull += pops(rate=110, centre_hz=1100, octaves=.4) * undb(dull_pops_db)
    return bright * crisp + dull * palm


def squeak(s=5.248, hz=490, db=-45, length=0.031):
    """Dry skin catches on the ball of tape for a moment: a brief sine swell."""
    return np.sin(2 * np.pi * hz * TIME) * hump(s, length) * undb(db)


def left_leads(x, lag_ms):
    """The sound reaches the left microphone earlier; a negative lag favours the right."""
    lag = int(round(lag_ms * SR / 1000))
    return np.array([np.roll(x[0], max(-lag, 0)), np.roll(x[1], max(lag, 0))])


def room(x, wet_db, count=16000):
    """Diffuse reflections from near walls, different at each microphone."""
    tail = 0
    for lo, hi, t60 in ROOM_BANDS:
        band = signal.butter(2, [lo, min(hi, .45 * SR)], "band", fs=SR, output="sos")
        tail = tail + signal.sosfilt(band, rng.standard_normal((2, count))) * fade(t60, count)
    tail *= 1 - fade(0.0033, count)  # the reflections build up softly
    response = unit(tail) / np.sqrt(count)
    return x + undb(wet_db) * signal.oaconvolve(x, response, axes=-1)[:, :N]


def lean(x, balance):
    """Share a sound between the microphones by (f/Hz, left minus right level/dB), slightly rescaled."""
    def share(sign):
        return [(hz, 20 * np.log10(2 / (1 + undb(-sign * db)))) for hz, db in balance]
    return np.vstack([colour(x[:1], share(0.88)), colour(x[1:], share(-0.96))])


def scene():
    """The shell lies to the right, the hands work to the left, with a room tail on both."""
    tearing, rubbed_shell = peel()
    shell = left_leads(drag() + knocks_and_bumps() + rubbed_shell + groan(), lag_ms=-.15)
    shell = lean(room(shell, wet_db=-8.0), SHELL_BALANCE)
    tape = snaps() + tearing + crumple() + squeak()
    in_hands = TIME < 5.5  # s; the tape leads further to the left until then
    tape = left_leads(tape * in_hands, lag_ms=.23) + left_leads(tape * ~in_hands, lag_ms=.09)
    tape = lean(room(tape, wet_db=-7.0), [(1000, -4.5), (4000, 0.5), (13000, -1.0)])
    return room_tone() + shell + tape


def record(dry):
    """The phone drops the deep bass, rounds the loudest peaks and cuts the top."""
    x = signal.sosfilt(signal.butter(5, 47, "high", fs=SR, output="sos"), dry)
    x = x / (1 + x ** 6) ** (1 / 6)
    return signal.sosfilt(signal.ellip(10, .2, 70, TOP_HZ, fs=SR, output="sos"), x)


dry = scene()
out = record(dry)
master_out(out)
```